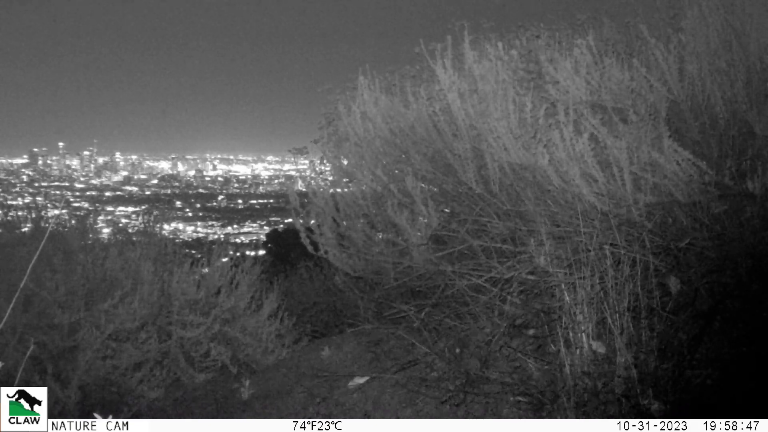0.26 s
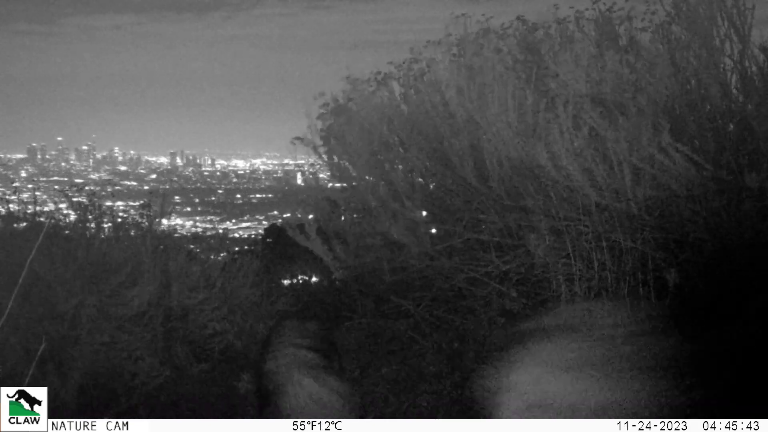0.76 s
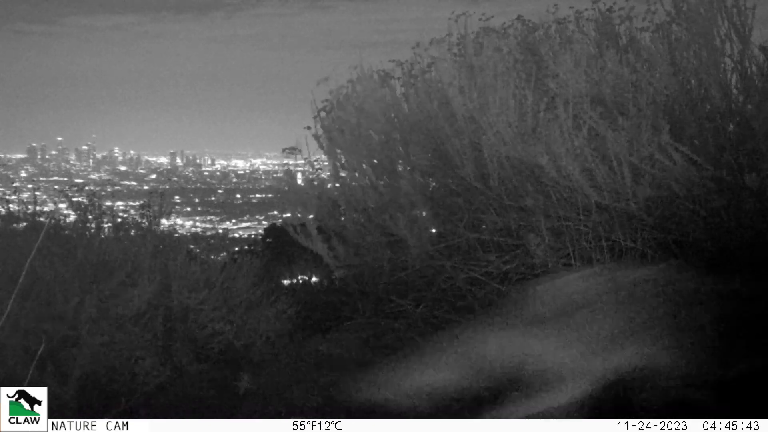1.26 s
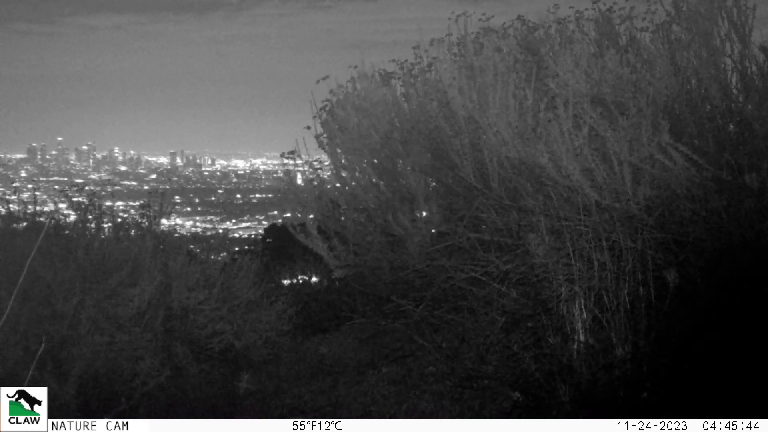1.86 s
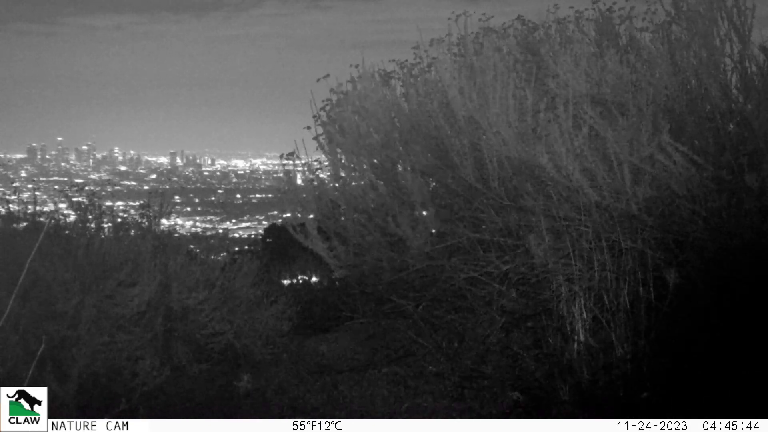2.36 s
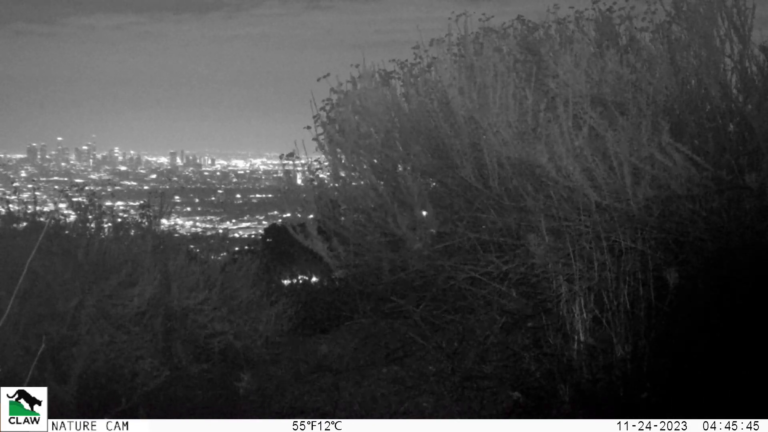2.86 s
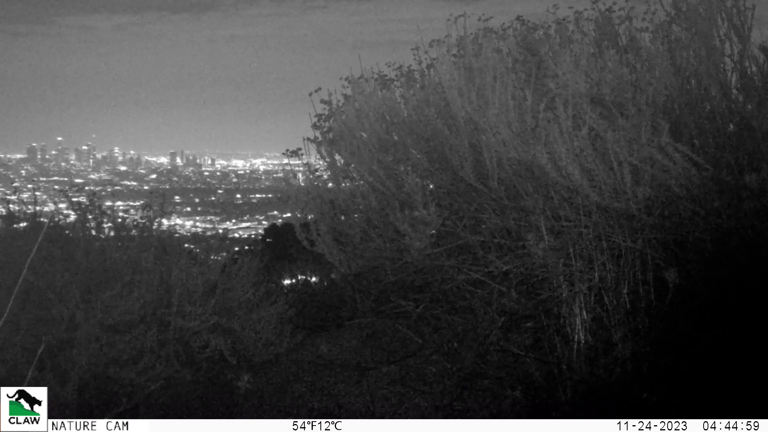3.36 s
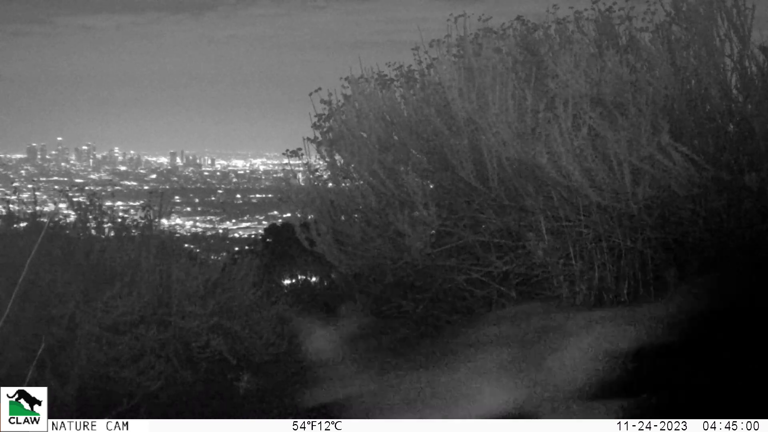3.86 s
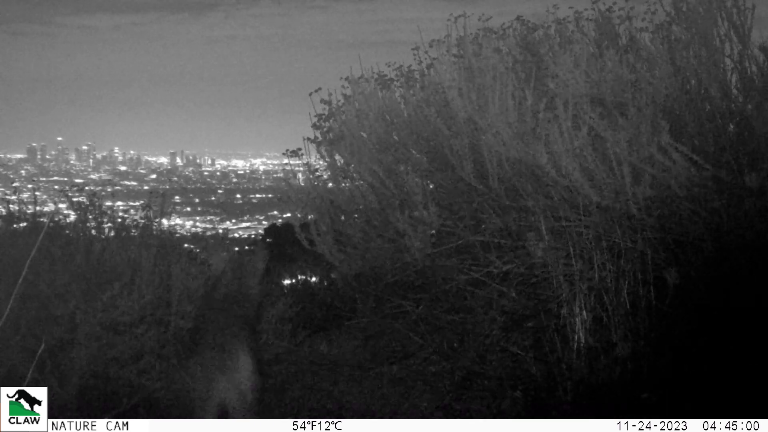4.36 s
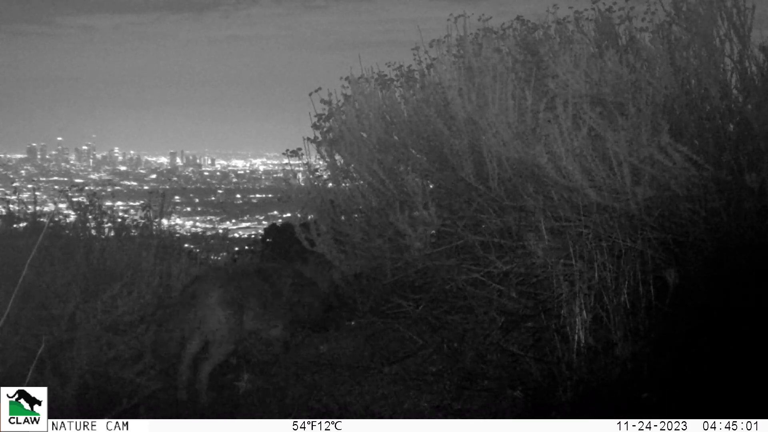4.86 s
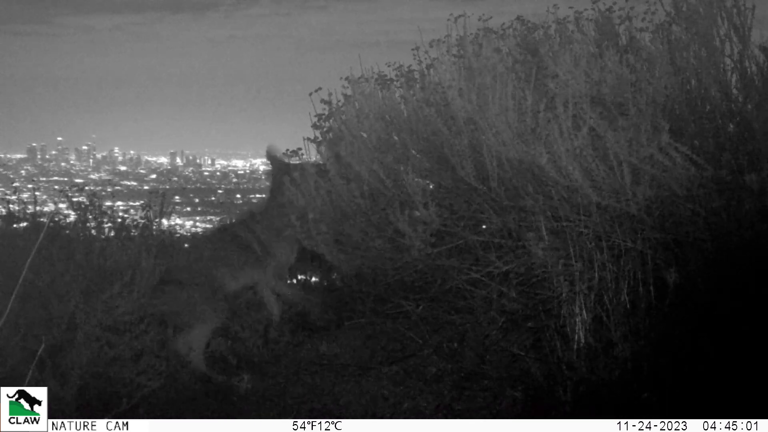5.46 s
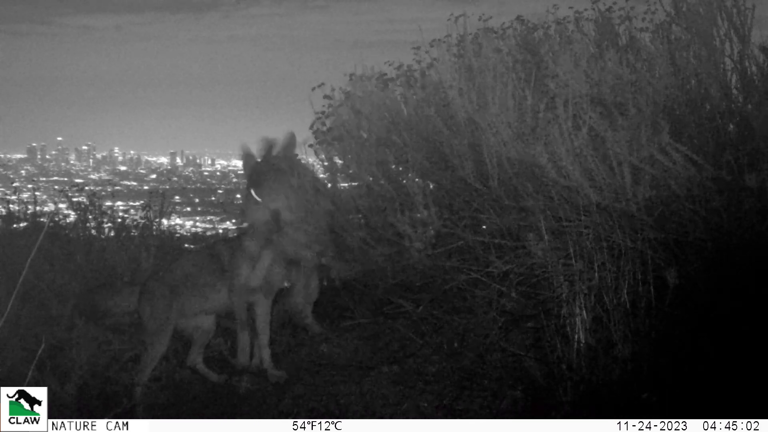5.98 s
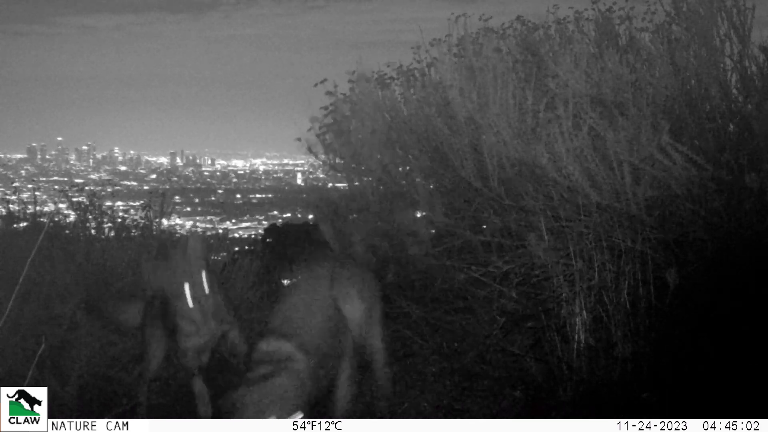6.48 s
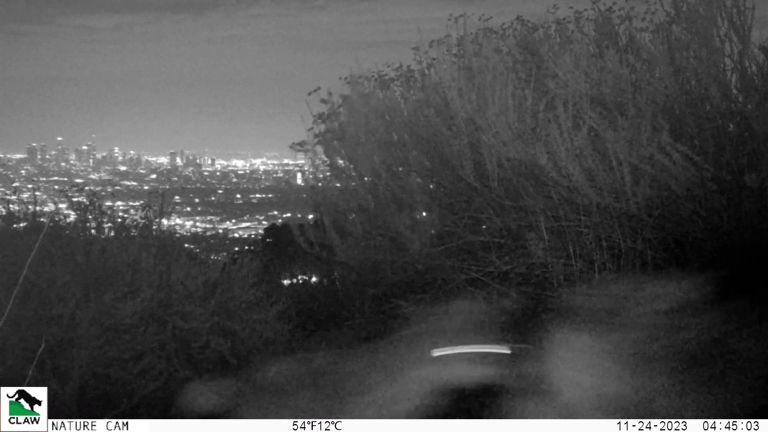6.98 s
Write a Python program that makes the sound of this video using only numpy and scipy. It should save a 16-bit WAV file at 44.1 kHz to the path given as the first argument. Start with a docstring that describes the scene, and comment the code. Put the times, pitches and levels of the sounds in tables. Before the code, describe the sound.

Outdoors at night, a low wind rumble and faint cricket chorus cut abruptly to hissier air. Animals crash through dry leaves close by, with dull paw thuds and sharp twig snaps. The rustling thins out, then six very high, scratchy strokes rasp in rhythm, like a small insect nearby. Softer rustles and light snaps return at the end. Lone crickets chirp far off over low city hum; the close microphone is noisy.

```python
"""Dry brush at night, where coyotes trot close to a trail camera with a hissy microphone. Leaves rustle in
clouds of tiny clicks, twigs snap as ringing noise bursts, and paws land as dull puffs of noise. Far crickets
chirp in pulsing tones; something small and near, perhaps an insect, rasps in very high noisy strokes. Shaped
noise makes the low city hum and bright hiss, a faint swell of traffic and a brief gust that rumbles at first.
Hum and hiss step in level at about 0.45 and 3.2 seconds and move slowly in between; a fainter wash of bright
noise sinks away from 0.5 to 1.5 seconds."""
import sys
import numpy as np
from scipy import signal
from scipy.fft import rfft, irfft
from scipy.io import wavfile

SR = 44100
rng = np.random.default_rng(int(sys.argv[2]) if len(sys.argv) > 2 else 0)


def to_wav(s):
    """Save 16-bit WAV."""
    ch = np.atleast_2d(s).T  # columns
    pcm = np.round(np.clip(ch, -1, 1) * 32767)  # PCM
    wavfile.write(sys.argv[1], SR, pcm.astype(np.int16))


N = 318843
TIME, FREQ = np.arange(N) / SR, np.fft.rfftfreq(N, 1 / SR)  # seconds, Hz

# Levels of the low hum and bright hiss, which step at about 0.45 and 3.2 seconds and move slowly in between;
# from 0.5 to 1.5 seconds the hiss level also carries a fainter wash of noise that sinks away. Each row: time in
# seconds, change of the hum in dB, level of the hiss in dB.
BACKGROUND = [(0, -3.5, -63), (.42, -6, -65.5), (.5, 0.5, -59), (1.5, -2, -63), (3.15, -4, -62.5),
              (3.3, 0.5, -60.5), (4.1, -1, -60), (5.6, 0, -60), (7.23, 0.5, -59)]


def gain_of(db):
    """Turns decibels into an amplitude factor."""
    return 10 ** (np.asarray(db) / 20)


def evened(x):
    """Scales a sound to an average (rms) level of 1."""
    return x / np.sqrt(np.mean(x ** 2) + 1e-20)


def add(mix, start, sound):
    """Mixes a sound in at a start time in seconds, cutting off whatever runs past the end."""
    part = mix[max(round(start * SR), 0):][:len(sound)]
    part += sound[:len(part)]


def coloured(x, points):
    """Shapes the balance of low and high pitches by (Hz, dB) points, then evens the level."""
    hz, db = np.transpose(points)
    gains = gain_of(np.interp(np.log(FREQ + 1), np.log(hz + 1), db))
    return evened(irfft(rfft(x) * gains, N))


def wander(length, rate):
    """Drifts by chance: random values, `rate` of them per second, joined by straight lines at rms 1."""
    knots = rng.standard_normal(int(length * rate / SR) + 3)
    return evened(np.interp(np.arange(length) * rate / SR, np.arange(len(knots)), knots))


def resonate(x, hz, width):
    """Rings at one pitch, fixed or moving, with a gain of 1 at its peak; both settings are in Hz."""
    turn = np.exp(2j * np.pi * np.cumsum(hz * np.ones(len(x))) / SR)
    r = np.exp(-np.pi * width / SR)
    # shift the pitch down to zero, smooth, then shift it back up
    smooth = signal.lfilter([1 - r], [1, -r], x / turn + 1e-18)
    return 2 * (turn * smooth).real


def thicket(x, wet_db, t60):
    """Stems and ground scatter a short spray of echoes, which falls by 60 dB in t60 seconds."""
    t = np.arange(SR // 8) / SR
    sparse = (rng.random(len(t)) < .1) * (t > .001)
    taps = rng.standard_normal(len(t)) * sparse * gain_of(-60 * t / t60)
    echoes = signal.oaconvolve(x, taps / np.linalg.norm(taps))[:N]
    return x + gain_of(wet_db) * echoes


def leaves(per_s=5000, spread_db=2.5, clump_db=2.0, level_db=1.3):
    """Dry leaves make countless tiny cracks, in clumps, whose loudness follows the push through them."""
    # The tone of the cracks. Each row: pitch in Hz, gain in dB.
    leaf_tone = [(300, -23), (1200, -21), (2400, -18.5), (4000, -13.5), (5000, -9.5), (5620, 0),
                 (6500, -0.7), (7500, -9.5), (10000, -11), (12000, -19), (16000, -30)]
    spread = spread_db * np.minimum(rng.exponential(1, N), 4.5)
    size = gain_of(spread + clump_db * wander(N, 140))
    cracks = size * rng.choice([-1, 1], N) * (rng.random(N) < per_s / SR)
    rustle = evened(thicket(coloured(cracks, leaf_tone), wet_db=-10.5, t60=0.037))
    return gain_of(level_db) * pushing() * rustle


def pushing(rise_s=0.03, sag_db=3.5, settle_db_per_s=185, stir_from_s=.39, stir_db=-71.5):
    """Leaves bend quickly under each push, give way, then spring back; a faint stir stays from stir_from_s on."""
    # A leg or flank pushes through dry leaves.
    # Each row: start in seconds, length in seconds before it settles, relative level in dB.
    pushes = [(.382, .08, -56.5), (0.451, 0.19, -49.5), (.67, 0.17, -52.5), (0.836, 0.1, -52),
              (0.976, 0.18, -50.5), (1.183, 0.2, -56.5), (1.443, 0.11, -57.5), (1.552, 0.18, -52.5),
              (1.76, 0.16, -60), (1.969, 0.21, -55), (2.155, 0.075, -48), (2.275, 0.11, -52.5),
              (2.407, .17, -61), (2.656, .035, -53), (2.74, 0.15, -62), (3.08, 0.036, -61),
              (3.154, 0.34, -65), (3.425, 0.03, -67), (3.687, 0.055, -52.5), (3.931, 0.073, -53.5),
              (5.452, 0.25, -60), (5.641, 0.1, -54.5), (5.68, .17, -54), (5.892, 0.31, -54.5),
              (6.228, 0.27, -58.5), (6.47, 0.13, -55.5), (6.596, 0.075, -57), (6.74, 0.23, -58),
              (6.998, .06, -63.5), (7.08, 0.027, -54), (7.164, .055, -58)]
    power = gain_of(stir_db) ** 2 * (TIME > stir_from_s)
    for start, length, db in pushes:
        t = np.maximum(TIME - start, 0)
        fade_db = sag_db * np.minimum(t / length, 1) + settle_db_per_s * np.clip(t - length, 0, 1)
        push = np.minimum(t / rise_s, 1) * gain_of(db - fade_db)
        power = power + push ** 2
    return np.sqrt(power)


def twigs(break_s=0.00079, splinter_db=-6, wood_width=3500, fracture=2.7,
          port_hz=6250, port_width=750, port_db=4.5, level_db=13.5):
    """Each twig gives one crack and a run of splinters, ringing briefly at its own pitch."""
    # Breaking twigs. Each row: start in seconds, relative level in dB, pitch of the ring in Hz,
    # seconds for the splinters to fall by 20 dB, gain of the broad crack in dB.
    snaps = [(.478, -37, 6260, .033, -8), (.591, -35.5, 5960, 0.014, -8), (0.866, -31, 5940, 0.061, 1),
             (.884, -36, 5600, 0.015, 2), (1.063, -37, 4840, .006, 0), (1.108, -40, 4130, 0.065, -16),
             (1.287, -38, 5400, 0.028, -9), (1.299, -36, 6460, 0.011, -11),
             (1.3636, -24.5, 6670, 0.011, -13), (1.373, -37, 9700, .015, -11),
             (1.405, -29, 8650, 0.022, -4), (1.4166, -24.5, 6600, 0.021, -6), (1.4345, -33, 9800, .003, -9),
             (1.469, -39.5, 7450, .01, -11), (1.485, -35.5, 7550, .028, -6), (1.531, -34, 3850, .0037, -11),
             (1.5364, -27, 6300, .0063, -13), (1.566, -35.5, 7400, .006, -13),
             (1.603, -32.5, 6000, 0.013, -6), (1.638, -26, 5800, .025, -7),
             (1.682, -19.5, 4540, 0.0066, -4), (1.77, -38, 6300, .012, 1), (1.799, -39, 7300, .012, -7),
             (1.8338, -33.5, 6800, .0041, -18), (1.913, -35.5, 6600, .005, -23),
             (2.1292, -33.5, 4200, .001, -1), (2.215, -29, 6800, .02, -10),
             (2.2787, -41, 5060, 0.0059, -20), (2.743, -24, 7600, 0.018, -20),
             (3.097, -43.5, 9600, .025, -4), (5.708, -36, 6260, .025, -4), (5.727, -32, 6300, .05, -11),
             (5.817, -35, 6800, 0.012, -2), (5.950, -33.5, 6400, 0.022, -13), (6.0154, -37, 6200, .008, -9),
             (6.377, -38, 6500, 0.037, -8), (6.5042, -40, 6240, .02, -11), (6.516, -34.5, 6700, 0.02, -7),
             (7.104, -38, 6530, .027, -1)]
    out, t = np.zeros(N), np.arange(SR // 10) / SR
    for start, db, hz, splintering, crack_db in snaps:
        tearing = np.exp(-(t / break_s) ** 2) + gain_of(splinter_db - 20 * t / splintering)
        fibres = rng.choice([-1, 1], len(t)) * (rng.random(len(t)) < .6) * tearing
        wood = signal.iirpeak(hz, hz / wood_width, fs=SR)
        wood_ring = signal.lfilter(*wood, signal.lfilter(*wood, fibres))
        # the lower the ring, the much lower the crack reaches
        crack_band = signal.butter(2, [hz ** 2 / 13000, min(1.8 * hz, 13000)], "bandpass", fs=SR)
        crack = signal.lfilter(*crack_band, fibres + fracture * (t == 0))
        snap = wood_ring + gain_of(crack_db) * crack
        snap = snap + gain_of(port_db) * resonate(snap, port_hz, port_width)  # the microphone port rings along
        add(out, start, gain_of(db) * snap / np.linalg.norm(snap))
    # the microphone rolls off the top of the snaps
    rolled_off = signal.lfilter(*signal.butter(2, 12500, fs=SR), out)
    return gain_of(level_db) * thicket(rolled_off, wet_db=-8.5, t60=.04)


def paws(t60=0.032, level_db=-16):
    """A pad lands on dirt with a short dull puff: fading noise through two wide resonances."""
    # Paws landing. Each row: start in seconds, relative level in dB, pitch in Hz.
    landings = [(.750, -52, 595), (.865, -50, 380), (0.886, -53, 1010), (.91, -51, 400), (1.02, -49.5, 350),
                (1.064, -55, 450), (1.099, -45, 985), (6.641, -53.5, 596)]
    out, t = np.zeros(N), np.arange(SR // 20) / SR
    for start, db, hz in landings:
        puff = resonate(rng.standard_normal(len(t)) * gain_of(-60 * t / t60), hz, hz)
        add(out, start, gain_of(db + level_db) * evened(resonate(puff, hz, 2 * hz)))
    return out


def rasping(level_db=-0.5):
    """All the rasping strokes sound through the same narrow resonances and the brush."""
    # The strokes. Each row: start in seconds, length in seconds, relative level in dB, first touch in dB,
    # swell in seconds, release in seconds, first pitch in Hz, pitch it heads for in Hz, gain of the wide scrape in dB.
    strokes = [(0.034, 0.1, -49.2, -4, 0.033, 0.037, 10150, 11000, 2),
               (4.21, 0.15, -50.5, -8.5, .095, 0.032, 10900, 11800, 2),
               (4.371, 0.2, -43, -10, 0.12, .012, 10800, 12600, 1.5),
               (4.567, 0.23, -42, -9.5, 0.098, 0.026, 11260, 12650, 0.5),
               (4.791, .225, -41.5, -17.5, 0.085, 0.02, 11400, 12600, 2.5),
               (5.012, 0.25, -42, -16.5, 0.075, 0.0093, 11350, 12800, 2),
               (5.255, 0.19, -43, -11.5, 0.061, 0.057, 11140, 12900, 1)]
    # Fixed resonances that colour the rasp. Each row: pitch in Hz, width in Hz, gain in dB.
    modes = [(9550, 120, -3), (10200, 160, -4), (11090, 70, -4), (11250, 70, -1), (11400, 60, -3),
             (11970, 90, -2), (12270, 70, -2), (12770, 100, -4)]
    out = np.zeros(N)
    for start, *settings in strokes:
        add(out, start, rasp(*settings))
    out = out + sum(gain_of(db) * resonate(out, hz, width) for hz, width, db in modes)
    return gain_of(level_db) * thicket(out, wet_db=-8.0, t60=.03)


def rasp(length, db, touch_db, swell, release, first_hz, last_hz, skirt_db,
         teeth_per_s=165, stutter_per_s=80, stutter_db=1.0, under_db=-12, tight_db=-1,
         climb_after=0.25, climb_span=0.33):
    """Teeth catch unevenly; one resonance climbs and widens through the stroke while a weaker one sinks and fades."""
    # The tone of the wide scrape. Each row: pitch in Hz, gain in dB.
    wide_tone = [(4000, -48), (5500, -26), (6500, -0.5), (8000, 2), (9500, 5), (12000, 3.5), (14000, 6),
                 (16000, -1.5)]
    t = np.arange(0, length, 1 / SR)
    u = np.linspace(0, 1, len(t))  # share of the stroke that has passed

    # both rates wander around their settings
    tooth = np.cumsum(teeth_per_s * (1 + .14 * wander(len(t), 150))) / SR % 1
    stutter = np.sin(2 * np.pi * np.cumsum(stutter_per_s * (1 + 0.064 * wander(len(t), 85))) / SR)
    stutter_depth_db = stutter_db * (1 - 0.71 * u) ** 2  # deepest at the start of the stroke
    catches = .75 + np.exp(-tooth / .45)
    scrape = rng.standard_normal(len(t)) * catches * gain_of(stutter_depth_db * stutter)

    # the pitch holds, then climbs fast and levels off
    main_hz = last_hz + (first_hz - last_hz) * np.exp(-np.maximum(u - climb_after, 0) / climb_span)
    tight = evened(resonate(resonate(scrape, main_hz, 810), main_hz, 1800))
    broad_hz = main_hz + 300 * u
    broad = evened(resonate(resonate(scrape, broad_hz, 2500), broad_hz, 2700))
    opening = np.interp(u, [.25, .55], [.25, 1])
    closing = np.sqrt(np.maximum(1 - opening ** 2, 0))
    main = opening * broad + closing * gain_of(tight_db) * tight

    under_hz = np.interp(u, [.1, .58], [7200, 6100])
    under = evened(resonate(resonate(scrape, under_hz, 980), under_hz, 1200))
    under_fade = np.interp(u, [.5, .65], [1, .1])

    pressure = np.interp(t, [.11, .16, .24], [1, .42, .17])  # bears down at first, then lets up
    wide_hz, wide_db = np.transpose(wide_tone)
    wide_gains = gain_of(np.interp(np.fft.rfftfreq(len(t), 1 / SR), wide_hz, wide_db))
    wide = evened(irfft(rfft(scrape) * wide_gains, len(t)))

    sound = main + pressure * gain_of(skirt_db) * wide + under_fade * gain_of(under_db) * under
    envelope = stroke_envelope(t, length, touch_db, swell, release)
    return gain_of(db) * envelope * evened(sound) * signal.windows.tukey(len(t), .02)


def stroke_envelope(t, length, touch_db, swell, release, ease_db_per_s=35):
    """A stroke swells from a light touch, eases off slowly and lifts away at the end."""
    db = touch_db * np.maximum(1 - t / swell, 0) ** 2 - ease_db_per_s * np.maximum(t - swell, 0)
    return gain_of(db) * np.clip((length - t) / release, 0, 1)


def crickets(chorus_db=-1.5, lone_db=-5.0):
    """A chorus sings at first, then lone tree crickets call, all blurred by distance and scrub."""
    # The opening chorus. Each row: start in seconds, end in seconds, pitch in Hz, relative level in dB,
    # average wing strokes per second.
    chorus = [(0, .6, 2400, -73, 29), (0, .45, 2610, -70.3, 33), (0, 0.41, 2770, -70.5, 39),
              (0, 0.34, 2980, -70, 36), (0, .45, 3110, -66, 46), (0, .39, 3260, -70.5, 37),
              (.17, .39, 4090, -72, 49)]
    # Lone chirps. Each row: start in seconds, length in seconds, name of the caller.
    chirps = [(2.313, 0.2, "middle"), (3.173, 0.14, "low"), (3.67, 0.18, "high"), (4.31, .22, "low"),
              (4.65, 0.17, "high"), (5.35, 0.18, "low"), (5.485, .155, "high"), (6.291, 0.2, "low"),
              (6.405, .155, "high"), (6.894, 0.26, "middle")]
    # The lone callers by name. Each row: first pitch in Hz, last pitch in Hz, relative level in dB.
    callers = {"far": (3300, 3350, -75.5), "low": (3200, 3222, -66), "middle": (3240, 3335, -69),
               "high": (3380, 3525, -66.5)}
    out = np.zeros(N)
    for start, end, hz, db, rate in chorus:
        add(out, start, gain_of(db + chorus_db) * chirp(end - start, hz, hz, rate, sag=0.099))
    for start, length, caller in chirps:
        first_hz, last_hz, db = callers[caller]
        call = chirp(length, first_hz, last_hz, strokes_per_s=35.8, sag=0.059)
        add(out, start, gain_of(db + lone_db) * call)
    return thicket(out, wet_db=-5.0, t60=0.16)


def chirp(seconds, first_hz, last_hz, strokes_per_s, sag):
    """A run of wing strokes pulses a tone, which sags within each stroke."""
    u = np.linspace(0, 1, max(int(seconds * SR), 500))
    stroke_rate = strokes_per_s * (1 + 0.042 * wander(len(u), 30))
    stroke = (np.cumsum(stroke_rate) / SR + rng.random()) % 1
    glide_hz = last_hz + (first_hz - last_hz) * (1 - u) ** 2
    hz = glide_hz * (1 - sag * (stroke - .5) + 0.137 * sag * wander(len(u), 149.3))
    tone = np.sin(2 * np.pi * np.cumsum(hz) / SR)
    return evened(tone * np.sin(np.pi * stroke) ** 3 * signal.windows.tukey(len(u), .07))


def gust(start_db=-44.5, end_s=0.41, ease_db_per_s=4.5, die_db_per_s=164):
    """Wind rumbles on the microphone housing: low noise that eases, then drops away."""
    # The tone of the wind. Each row: pitch in Hz, gain in dB.
    wind_tone = [(12, -38), (20, 1), (87, -1), (151, -10.5), (215, -21), (270, -17.5), (350, -33),
                 (550, -37.5), (820, -36.5), (1200, -50), (1600, -120)]
    db = start_db - ease_db_per_s * TIME - die_db_per_s * np.clip(TIME - end_s, 0, 1)
    return gain_of(db) * coloured(rng.standard_normal(N), wind_tone)


def city_hum(base_db=-58.5):
    """The distant city hums: low noise whose level steps twice and moves slowly in between."""
    # The tone of the hum. Each row: pitch in Hz, gain in dB.
    hum_tone = [(12, -30), (20, -2), (65, -0.55), (111, -3), (177, -9), (204, -10), (276, -14), (561, -19),
                (646, -19.5), (775, -19.5), (1340, -23), (1570, -24.5), (2500, -28.5), (3250, -62),
                (5500, -120)]
    s, change_db, _ = np.transpose(BACKGROUND)
    return gain_of(base_db + np.interp(TIME, s, change_db)) * coloured(rng.standard_normal(N), hum_tone)


def traffic(peak_db=-71.0, hz=930):
    """Distant tyres make one faint swell of noise through two resonances."""
    tyres = evened(resonate(resonate(rng.standard_normal(N), hz, 500), hz, 810))
    return gain_of(peak_db) * np.interp(TIME, [2.5, 5.5, 6.8], [0, 1, 0]) * tyres


def microphone_hiss():
    """The microphone hisses: bright noise whose level steps twice and moves slowly in between; from 0.5 to 1.5
    seconds a fainter wash of noise rides on it and sinks away."""
    # The tone of the hiss. Each row: pitch in Hz, gain in dB.
    hiss_tone = [(300, -17), (1300, -3.5), (2000, 3.5), (3000, 2.5), (4500, 2.5), (6000, 2), (8000, 1.5),
                 (9500, 0.5), (12000, 0.5), (16000, 0.5)]
    s, _, hiss_db = np.transpose(BACKGROUND)
    return gain_of(np.interp(TIME, s, hiss_db)) * coloured(rng.standard_normal(N), hiss_tone)


def scene():
    """Everything adds up at one microphone."""
    animals = leaves() + twigs() + paws() + rasping() + crickets()
    background = gust() + city_hum() + traffic() + microphone_hiss()
    return (animals + background)[None]


def record(dry, edge_hz=15850):
    """The recorder lets through only what lies below its upper band limit."""
    low_pass = signal.firwin(601, edge_hz, window=("kaiser", 8), fs=SR)
    return signal.oaconvolve(dry, low_pass[None], "same")


dry = scene()
out = record(dry)
to_wav(out)
```